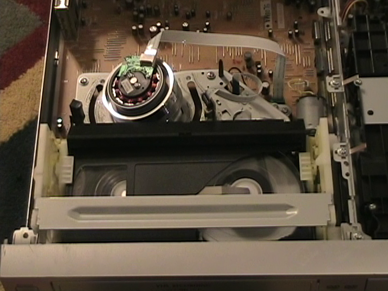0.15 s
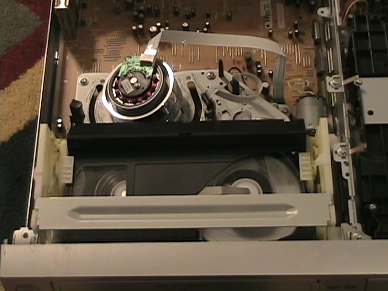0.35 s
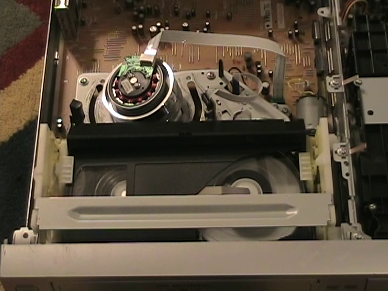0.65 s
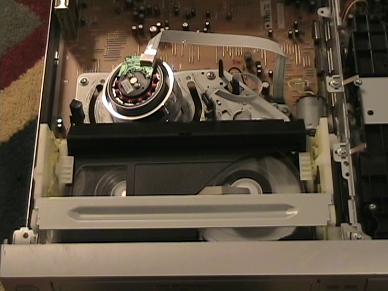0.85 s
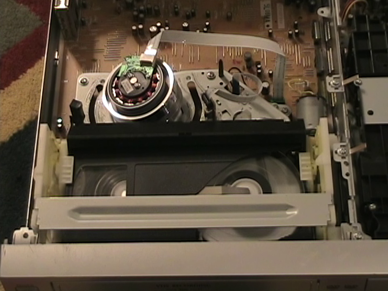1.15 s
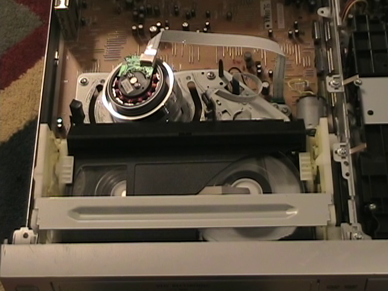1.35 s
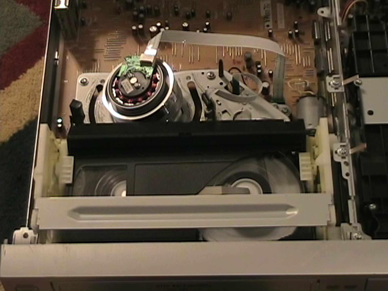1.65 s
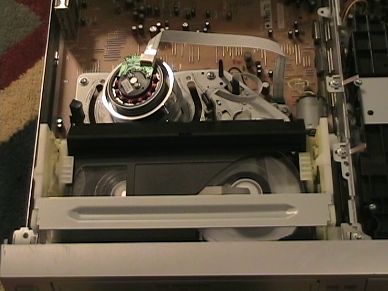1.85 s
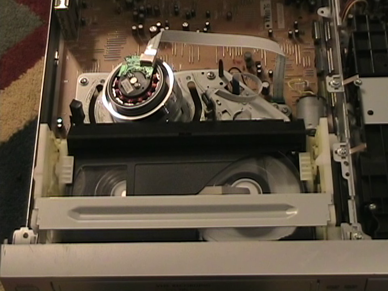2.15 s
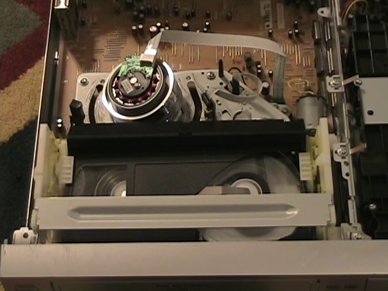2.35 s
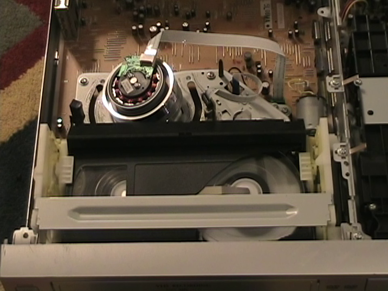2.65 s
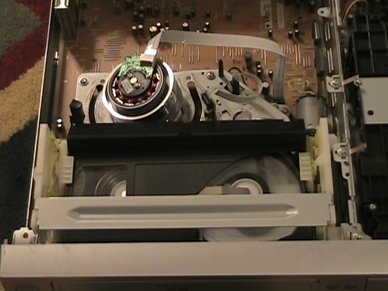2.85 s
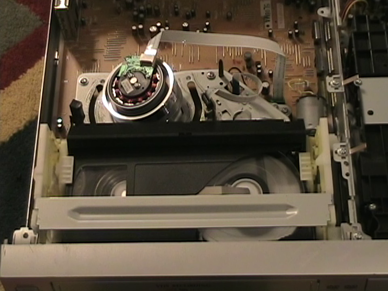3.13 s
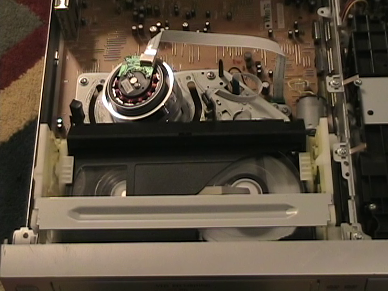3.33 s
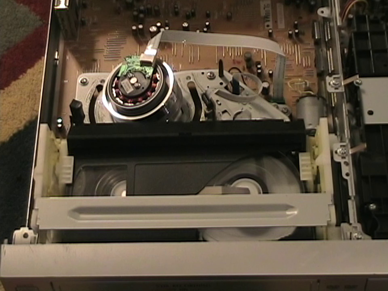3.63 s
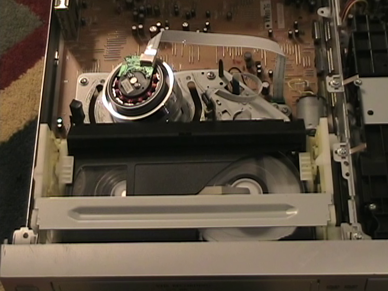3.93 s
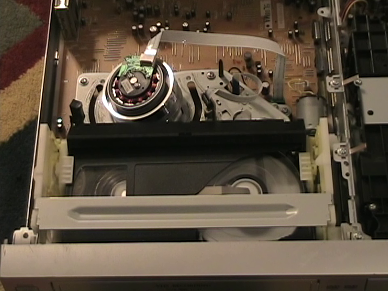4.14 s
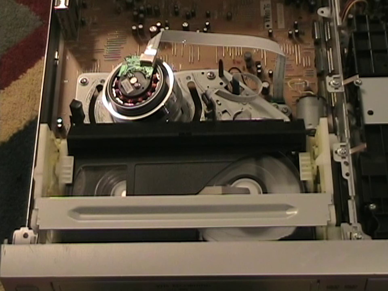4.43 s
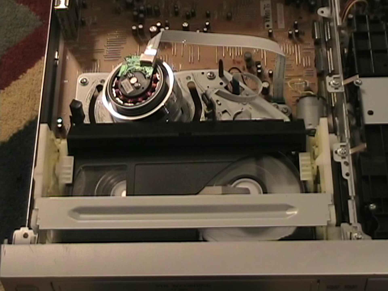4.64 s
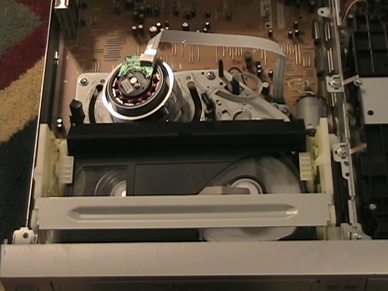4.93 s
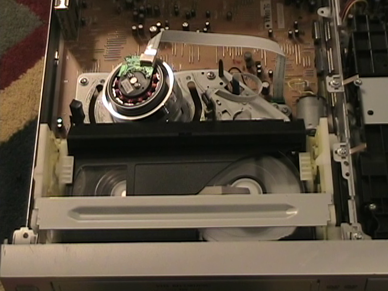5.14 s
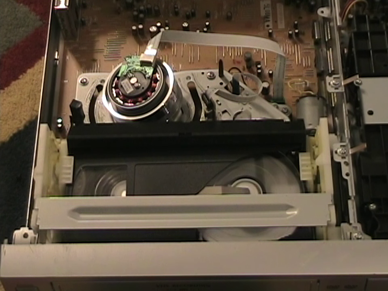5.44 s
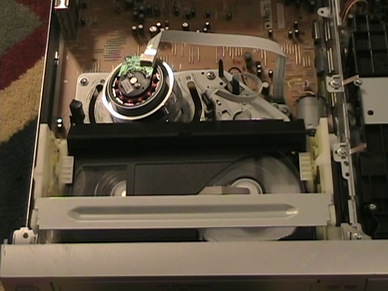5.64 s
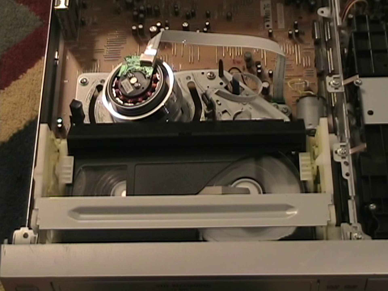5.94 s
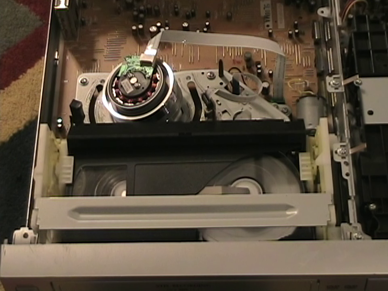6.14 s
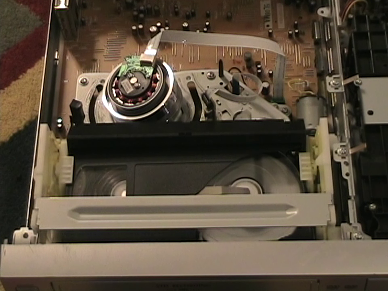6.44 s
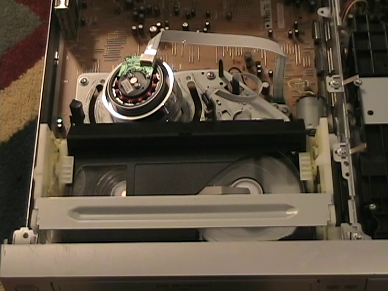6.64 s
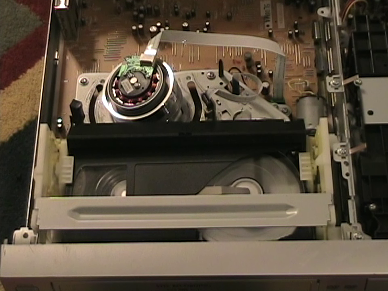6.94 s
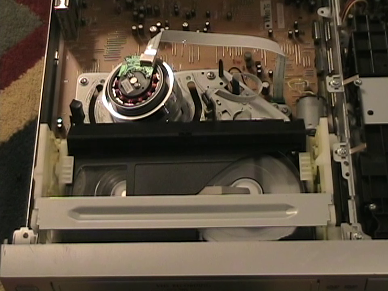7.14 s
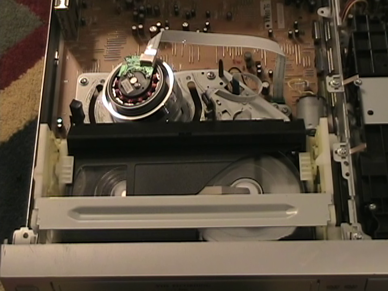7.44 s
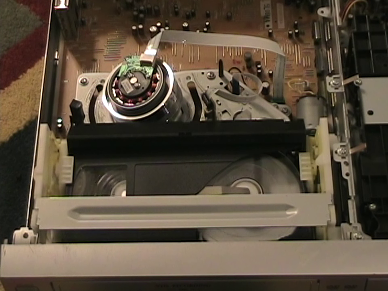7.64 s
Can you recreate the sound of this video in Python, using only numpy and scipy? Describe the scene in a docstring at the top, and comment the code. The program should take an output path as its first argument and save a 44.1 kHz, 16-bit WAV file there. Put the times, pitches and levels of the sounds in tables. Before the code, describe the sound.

Close to an open video cassette recorder indoors, a dense metallic motor whine and rough buzz run without pause, with tape hiss and rubbing fluttering very fast underneath. The pitch sags slightly and wavers in colour as a high squeal grows. Near seven seconds the motor brakes: the whine plunges, stuttering and knocking, almost to a halt. Close, dry stereo pickup with little bass.

```python
"""A buzzing motor whine over tape that rubs and throbs once a turn: an open video recorder rewinds
a damaged cassette, close to a small stereo microphone. The drive motor kicks nine times a turn; its partials
and small flaws ring the deck. As it sags under load, partials slide through narrow resonances and
the tape squeals more. In the last second it brakes almost evenly, juddering and knocking, and a ladder
of stuttering partials falls through the resonances. Rubbing is filtered noise, knocks are noise bursts."""
import sys
import numpy as np
from scipy import signal
from scipy.fft import rfft, irfft, next_fast_len
from scipy.io import wavfile

SR = 44100
rng = np.random.default_rng(int(sys.argv[2]) if len(sys.argv) > 2 else 0)


def wav_out(sig):
    """Save sig, one row per channel (or a flat mono array), as 16-bit PCM at SR to the path in sys.argv[1]."""
    wavfile.write(sys.argv[1], SR, np.round(np.clip(np.atleast_2d(sig).T, -1, 1) * 32767).astype(np.int16))


N = 343098
TIME = np.arange(N) / SR
SIZE = next_fast_len(N + 4096)
BINS = np.maximum(np.arange(SIZE // 2 + 1) * SR / SIZE, 1)  # hz

# speed of the running motor, sagging under the load: time_s, speed_turns_per_s
SPEED = [(0.0, 59.97), (0.86, 59.92), (1.02, 59.46), (1.42, 59.48), (1.98, 59.39), (2.3, 59.19),
         (2.94, 59.15), (3.58, 58.81), (3.74, 58.83), (4.22, 58.55), (5.02, 58.3), (5.26, 58.34),
         (5.66, 58.06), (6.06, 57.57), (6.7, 57.15), (6.9, 56.68)]
# the brake slows the motor almost evenly: time_s, speed_turns_per_s
RUN_DOWN = [(6.9, 56.68), (6.95, 55.6), (7.03, 53.8), (7.11, 49.1), (7.35, 34.8), (7.5, 25.55), (7.78, 8.5)]
# the drive catches once a turn, lightly at first and hard under braking: time_s, depth_0_to_1
JUDDER = [(0, .05), (2.2, .1), (3.5, .02), (6.9, 0), (7.05, .2), (7.16, .36), (7.25, .2), (7.38, .06),
          (7.78, .12)]

# motor partials, clustered round the multiples of nine: turn_rate_multiple, relative_level_db
TONES = [(8, -58.5), (10, -49.5), (11, -56.5), (15, -56.5), (16, -53), (18, -40), (19, -46.5), (21, -44),
         (26, -41.5), (27, -35), (28, -38.5), (29, -45.5), (30, -50.5), (31, -49), (34, -42.5), (35, -47.5),
         (36, -41), (37, -40.5), (38, -44.5), (39, -45.5), (43, -42.5), (44, -46), (45, -30.5), (46, -44.5),
         (48, -46), (52, -44), (53, -41), (54, -44), (55, -39.5), (56, -48.5), (63, -46.5), (64, -41),
         (71, -47.5), (72, -44.5), (73, -37.5), (74, -46), (75, -44), (81, -45.5), (82, -40.5), (83, -48),
         (88, -46), (89, -44), (90, -41), (91, -42), (92, -52.5), (93, -57), (94, -59), (95, -41.5),
         (96, -47), (97, -42), (98, -45.5), (99, -45), (100, -39.5), (101, -38.5), (103, -42.5),
         (107, -41.5), (108, -40), (109, -42), (111, -43.5), (118, -42), (125, -44), (126, -42), (127, -45),
         (136, -57), (145, -42.5), (153, -43), (154, -43.5), (164, -58), (171, -51), (172, -57), (183, -55),
         (188, -57), (189, -58), (190, -47), (199, -37), (208, -51)]
# partials that sing out for a while (a negative level dips; a row ending before its start adds only a faint
# bump between the two times, or nothing once the gap is a twentieth of a second or more): start_s, end_s,
# turn_rate_multiple, added_level_db
SWELLS = [(0.0, 0.86, 28, 2.5), (0.0, 0.958, 19, 5), (0.0, 1.03, 56, 12), (0.0, 1.03, 71, 11),
          (0.0, 1.0, 111, 8), (0.0, 1.0, 164, 15), (0.0, 2.9, 38, 5), (0.0, 2.7, 46, 9.5),
          (0.0, 5.6, 90, 5.5), (0.0, 5.75, 37, 5.5), (2.0, 5.8, 99, 7.5), (3.0, 5.3, 97, 5),
          (3.1, 5.6, 92, 13), (3.1, 6, 74, 4), (3.3, 3.9, 96, 5), (0.0, 5.1, 63, 10), (4.1, 7.7, 73, 2.5),
          (4.447, 5.597, 45, 3), (4.5, 5.1, 48, 0), (4.5, 5.7, 54, 9), (4.9, 6.3, 100, 3),
          (5.203, 6, 96, 12), (5.7, 5.3, 109, 4), (5.8, 6.938, 36, 8), (5.8, 6.6, 189, 17),
          (5.9, 6.9, 108, -1), (6.702, 6.93, 36, 5.5), (6.93, 7.04, 45, 6), (6.94, 6.9, 72, 13),
          (6.98, 6.6, 18, 2.5), (7.0, 7.4, 90, 8), (7.02, 7.09, 63, 6), (7.03, 7.08, 81, 6),
          (7.09, 7.3, 99, 7), (7.11, 7.2, 54, 4), (7.13, 7.18, 36, 4), (7.2, 7.57, 36, 6.5),
          (7.18, 7.38, 45, 2), (7.27, 7.2, 72, 12), (7.32, 6.7, 54, 5), (7.37, 7.43, 99, 5),
          (7.42, 7.47, 90, 5), (7.44, 7.52, 63, 3)]
# narrow modes of the motor's mounting: centre_hz, half_width_hz, peak_db
MOUNT_MODES = [(1071, 36, 2.5), (1135.7, 6.9, 7), (1516, 14.5, 7), (1732, 155, 8), (2065, 46, 5.5),
               (2178, 29, 4.5), (2574, 45, 5.5), (3199, 38, 5.5), (5328, 120, 11.5), (5547, 57, 8),
               (5652, 64, 11), (5863, 93, 6.5), (6167, 154, 9)]
# broad colour of the deck: frequency_hz, relative_density_db
DECK = [(90, -81.5), (400, -85), (600, -75), (1100, -71), (1800, -60.5), (3400, -67.5), (4900, -63.5),
        (6500, -63), (8200, -67.5), (12500, -65), (14400, -79)]
# resonances of chassis and cassette shell: centre_hz, half_width_hz, peak_db
RESONANCES = [(1500, 88, 4.5), (2018, 38, 3.5), (2660, 130, 3), (3210, 140, 3.5), (3910, 260, 3),
              (5340, 140, -1.5), (5660, 480, 7), (7380, 210, 3), (10180, 90, 9), (11090, 140, 7)]

# rubbing of tape and reels, one row per band: start_db, added_by_full_load_db, added_by_braking_to_a_stop_db
GRIND = (-3.5, -1, 15)
RUSTLE = (-2.1, 0.92, 4.7)
SWISH = (-5, 2.8, 1)
HISS = (-1.4, 4.4, -9.5)
# tape squeal that repeats on every turn: time_s, level_db
SQUEALING = [(0, -39), (2.9, -34), (3.6, -30.5), (5.8, -29), (6.85, -29), (7.05, -26.5), (7.18, -22.5),
             (7.3, -30), (7.78, -42)]

# colour of the braking whine, one partial on every kick-rate multiple: frequency_hz, relative_partial_db
BRAKE_COLOUR = [(300, -69), (480, -52.5), (700, -43.5), (1000, -38), (1300, -37), (1680, -26),
                (1900, -29.5), (2150, -36.5), (2550, -34.5), (2900, -42), (3250, -39), (3550, -46),
                (4300, -43), (4750, -40), (5100, -43), (5600, -34.5), (6000, -36), (6600, -44), (9000, -55)]
# balance of the braking sounds: time_s, whine_db, knocks_db
BRAKING = [(6.86, -50, -45), (6.95, -2, -6), (7.12, -1, -3), (7.3, 0, 2), (7.5, -.5, 1), (7.63, -1.5, 1),
           (7.7, -6.5, -4), (7.78, -5, -2)]

# likeness of the rubbing noise at the two ports: frequency_hz, likeness_0_to_1
LIKENESS = [(100, .9), (300, .8), (600, .99), (3000, .97), (6000, .93), (9000, .5), (14000, .45)]
# phase by which the left port leads: frequency_hz, lead_radians
PORT_PHASE = [(150, -3), (300, -1), (480, 0.21), (1900, 0.28), (2200, 0.5), (2650, -0.8), (3100, -0.8),
              (4000, -0.9), (6100, -1.3), (7800, -1.17), (9500, -0.5), (10800, -2.5), (11900, 3),
              (14000, -3)]
# left minus right: frequency_hz, difference_db
PORT_BALANCE = [(300, -1), (1500, 0), (2300, 1.5), (4000, 0.1), (8000, 0.5), (10000, 2), (12500, 0.2)]

CRUISE_TURNS_PER_S, KICKS_PER_TURN = 58.8, 9
CATCH_AT_TURN = .66  # where in the turn the throbs peak
SLIP_RADIANS = .0028  # shaft unevenness added at full load
SWELL_FADE_S = 0.052
WAVER_DB, WANDER_RADIANS, WANDER_PER_S = 1.0, .3, .3  # unsteadiness of the running partials
HISS_FLICKER_DB = 1.6
SQUEAL_DEPTH, SQUEAL_HZ, SQUEAL_WIDTH_HZ = .15, 5700, 450
STUTTER_DB, STUTTER_RADIANS, FLUTTER_DEPTH = 2.6, .42, .5  # unsteadiness of the braking partials
KICK_UNEVEN_DB = 3.0
CUTOFF_HZ = 14600


def from_db(db):
    """Decibels to gain."""
    return 10 ** (np.asarray(db) / 20)


def in_time(rows):
    """One curve per column, straight between the rows."""
    s, *columns = np.transpose(rows)
    return [np.interp(TIME, s, column) for column in columns]


def at_hz(points, hz):
    """Read a spectrum on a log-frequency axis."""
    f, value = np.transpose(points)
    return np.interp(np.log(hz), np.log(f), value)


def drift(rate, step=1):
    """Slow chance of spread 1 that changes about rate times a second, read at every step-th sample."""
    r = np.exp(-200 * np.pi * rate / SR)  # one slow value per 100 samples
    slow = signal.lfilter([1], [1, -2 * r, r * r], rng.standard_normal(N // 100 + 1002))[1000:]
    return np.interp(np.arange(0, N, step) / 100, np.arange(len(slow)), slow / slow.std())


def coloured(x, gain):
    """Filter by a gain for each frequency in BINS."""
    return irfft(rfft(x, SIZE) * gain, SIZE)[..., :N]


def ringing(x, gain_db):
    """Filter with the minimum phase of a response, so that it rings only after each kick."""
    cepstrum = irfft(np.log(from_db(gain_db)), SIZE)
    fold = 1 + np.sign(np.fft.fftfreq(SIZE))
    return coloured(x, np.exp(rfft(cepstrum * fold)))


def peaks_db(modes, hz):
    """Bell-shaped resonances, summed in dB."""
    return sum(db * np.exp(-((hz - centre) / width) ** 2) for centre, width, db in modes)


def deck_db(hz):
    """How strongly the deck radiates: its broad colour with the resonances on top."""
    return at_hz(DECK, hz) + peaks_db(RESONANCES, hz)


def throb(angle, depth):
    """A swell once per cycle of the angle, of unchanged mean power."""
    return (1 + depth * np.cos(angle)) / np.sqrt(1 + depth ** 2 / 2)


def flaws(angle, strengths, size=8192):
    """A rough pattern repeating on every turn, one strength per multiple; about unit power per Hz if all sound."""
    phases = 2 * np.pi * rng.random(len(strengths))
    turn = irfft(np.r_[0, strengths * np.exp(1j * phases)], size)
    place = angle / (2 * np.pi) % 1 * size
    wave = np.interp(place, np.arange(size + 1), np.r_[turn, turn[0]]) / turn.std()
    return wave * np.sqrt(len(strengths) * CRUISE_TURNS_PER_S)


def drive():
    """Turns per s, the load (0-1) that shows in the sag, and the share of the speed (0-1) the brake has taken."""
    running, = in_time(SPEED)
    speed, = in_time(SPEED + RUN_DOWN[1:])  # the run-down starts from the last running speed
    load = np.sqrt((running.max() - running) / np.ptp(running))
    return speed, load, 1 - speed / running


def swell_db(order, s):
    """A partial that sings out fades in, holds and fades out."""
    return sum(db * np.clip(.5 + np.minimum(s - start, end - s) / SWELL_FADE_S, 0, 1)
               for start, end, multiple, db in SWELLS if round(multiple) == order)


def partial(order, angle, cluster_phases, scatter_radians=1.195, steady_below_order=32):
    """One turn-rate multiple, rms 1; low clusters lean to pitch wobble, high ones to swells, slowly shifting."""
    cluster = round(order / KICKS_PER_TURN)
    # quadratic phases across a cluster turn its once-a-turn swell into a wobble
    wobble = (order < steady_below_order) * np.pi / 2 * (order - cluster * KICKS_PER_TURN) ** 2
    scatter = scatter_radians * rng.standard_normal() + WANDER_RADIANS * drift(WANDER_PER_S)
    return np.sqrt(2) * np.cos(order * angle + cluster_phases[cluster] + wobble + scatter)


def tones(speed, angle, cluster_phases, level_db=0.19):
    """The whine; as the motor slows its partials slide through the resonances of mounting and deck."""
    out, step = np.zeros(N), 64  # gains are worked out every 64 samples
    for order, db in TONES:
        hz = order * speed[::step]
        deck_change_db = deck_db(hz) - deck_db(order * CRUISE_TURNS_PER_S)
        resonance_db = deck_change_db + peaks_db(MOUNT_MODES, hz)
        unsteady_db = swell_db(order, TIME[::step]) + WAVER_DB * drift(3.03, step)
        gain = from_db(db + level_db + resonance_db + unsteady_db)
        out += np.interp(TIME, TIME[::step], gain) * partial(order, angle, cluster_phases)
    return out


def buzz(angle, level_db=-3.0, tilt_db=-1.0, count=360, lowest_order=8):
    """Small flaws of the running parts fill in the weak multiples between the partials."""
    orders = np.arange(1, count + 1)
    weak = ~np.isin(orders, [order for order, db in TONES]) & (orders >= lowest_order)
    tilt = tilt_db * np.log2(np.maximum(BINS, 1200) / 3000)  # dB per octave, level below 1200 Hz
    return ringing(flaws(angle, weak), deck_db(BINS) + level_db + tilt)


def rubbing(angle, load, braked, level_db=0.1, rustle_depth=0.087, swish_depth=0.2, hiss_depth=0.097,
            kick_depth=0.1, rumble_db=-2, grind_from_hz=560, rustle_from_hz=1200, swish_from_hz=3300,
            hiss_from_hz=7000):
    """Friction noise through the deck: faint rumble, grind, rustle, throbbing swish, hiss pulsing with the kicks."""
    grind_db, rustle_db, swish_db, hiss_db = (
        db + load_db * load + brake_db * braked
        for db, load_db, brake_db in (GRIND, RUSTLE, SWISH, HISS))

    # two ports share part of their noise
    alike = np.clip(at_hz(LIKENESS, BINS), 0, 1)
    common, apart = rfft(rng.standard_normal((2, SIZE)))
    noise = np.sqrt((1 + alike) / 2) * common + np.sqrt((1 - alike) / 2) * apart * [[1], [-1]]
    noise = noise * from_db(deck_db(BINS) + level_db) * np.sqrt(SR / 2)

    above_rustle, above_swish, above_hiss = (
        1 / (1 + (hz / BINS) ** 24) for hz in (rustle_from_hz, swish_from_hz, hiss_from_hz))
    above_grind = 1 / (1 + (grind_from_hz / BINS) ** 6)
    hiss_pulse = throb(angle, hiss_depth) * throb(KICKS_PER_TURN * angle, kick_depth)
    bands = [(1 - above_grind, from_db(rumble_db)),
             (above_grind - above_rustle, from_db(grind_db)),
             (above_rustle - above_swish, from_db(rustle_db) * throb(angle, rustle_depth)),
             (above_swish - above_hiss, from_db(swish_db) * throb(angle, swish_depth)),
             (above_hiss, from_db(hiss_db + HISS_FLICKER_DB * drift(23.0)) * hiss_pulse)]
    return sum(irfft(noise * band, SIZE)[:, :N] * gain for band, gain in bands)


def squeal(angle, slip_radians=.005, count=400):
    """The loaded tape sticks and slips nearly alike on every turn, ringing one high resonance of the deck."""
    level_db, = in_time(SQUEALING)
    slips = flaws(angle + slip_radians * drift(20), np.ones(count))
    band = coloured(slips, 1 / (1 + ((BINS - SQUEAL_HZ) / SQUEAL_WIDTH_HZ) ** 4))
    return band / band.std() * from_db(level_db) * throb(angle, SQUEAL_DEPTH)


def brake_whine(speed, angle, stutter_per_s=20, count=32):
    """Kick-rate multiples from the second up stutter, flutter once a turn and flare falling through resonances."""
    out, on = np.zeros(N), TIME > BRAKING[0][0]
    for order in KICKS_PER_TURN * np.arange(2, count):
        start, flutter = rng.uniform(0, 2 * np.pi, size=2)
        colour_db = at_hz(BRAKE_COLOUR, order * speed[on])
        db = colour_db + swell_db(order, TIME[on]) + STUTTER_DB * drift(stutter_per_s)[on]
        phase = order * angle[on] + start + STUTTER_RADIANS * drift(2 * stutter_per_s)[on]
        out[on] += np.sqrt(2) * from_db(db) * throb(angle[on] + flutter, FLUTTER_DEPTH) * np.cos(phase)
    return out


def kicks(speed, angle, depth=0.036, rattle_s=.0016, soft_hz=3100, thin_below_hz=850):
    """Nine knocks a turn, each a short rattle of loose parts, ring the deck."""
    passed = np.floor(KICKS_PER_TURN * angle / (2 * np.pi))
    uneven = from_db(KICK_UNEVEN_DB * rng.standard_normal(N))
    clicks = np.diff(passed, prepend=passed[0]) * throb(angle, depth) * uneven
    r = np.exp(-1 / (rattle_s * SR))
    power = signal.lfilter([1 - r], [1, -r], clicks ** 2 + 1e-18)  # dies away after each click
    rattle = np.sqrt(power) * rng.standard_normal(N)
    thinning = (thin_below_hz / np.maximum(BINS, 100)) ** 6
    colour_db = deck_db(BINS) - 10 * np.log10(1 + (BINS / soft_hz) ** 4 + thinning)
    # even out the power as the knocks come more slowly
    return ringing(rattle * SR / np.sqrt(2 * KICKS_PER_TURN * speed), colour_db)


def scene(jitter_radians=0.0021, tones_braked_db=-55, buzz_braked_db=-8, buzz_depth=0.6):
    """One turning angle drives every layer; uneven running, worse under load, roughens the high partials."""
    speed, load, braked = drive()
    whine_db, kicks_db = in_time(BRAKING)
    judder, = in_time(JUDDER)
    turning = 2 * np.pi * (np.cumsum(speed) / SR - CATCH_AT_TURN)
    angle = turning + jitter_radians * drift(23) + SLIP_RADIANS * load * drift(33)
    cluster_phases = rng.uniform(0, 2 * np.pi, size=30)

    # the running sounds give way to the braking sounds as the motor slows
    whine = tones(speed, angle, cluster_phases) * from_db(tones_braked_db * braked)
    buzz_throb = throb(angle, buzz_depth * (1 - load ** 2))
    running = whine + buzz(angle) * buzz_throb * from_db(buzz_braked_db * braked)
    braking = from_db(whine_db) * brake_whine(speed, angle) + from_db(kicks_db) * kicks(speed, angle)
    return (running + braking + squeal(angle) + rubbing(angle, load, braked)) * throb(angle, judder)


def record(dry, low_cut_hz=85):
    """The two ports hear the deck out of phase; the bass is cut steeply and so is the top."""
    side = np.array([[1], [-1]])  # left, right
    phase = np.exp(.5j * side * at_hz(PORT_PHASE, BINS))
    ports = phase * from_db(.5 * side * at_hz(PORT_BALANCE, BINS))
    heard = coloured(dry, ports / (1 + (low_cut_hz / BINS) ** 4))
    return signal.sosfilt(signal.ellip(12, .1, 90, CUTOFF_HZ, fs=SR, output="sos"), heard)


dry = scene()
out = record(dry)
wav_out(out)
```